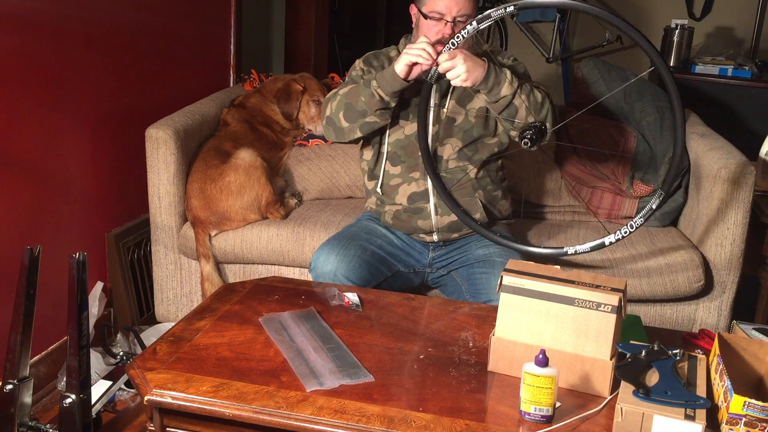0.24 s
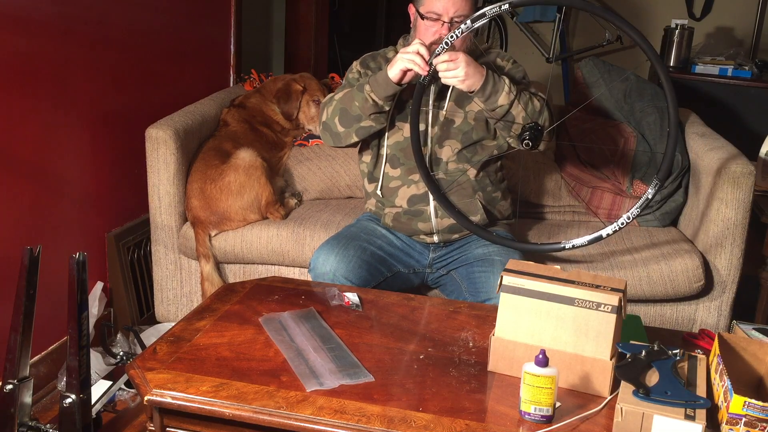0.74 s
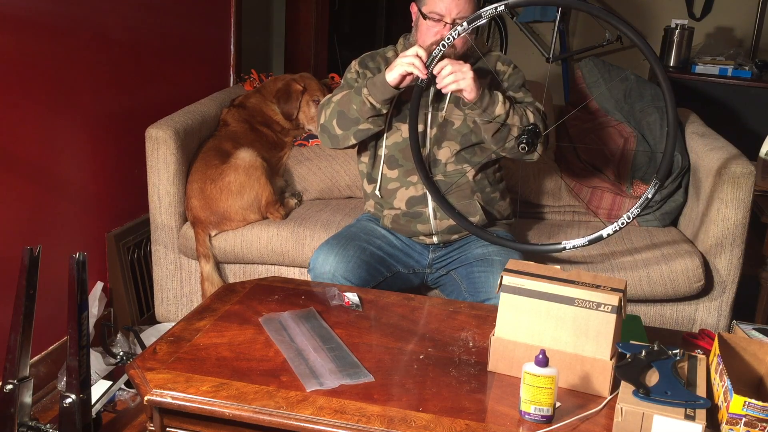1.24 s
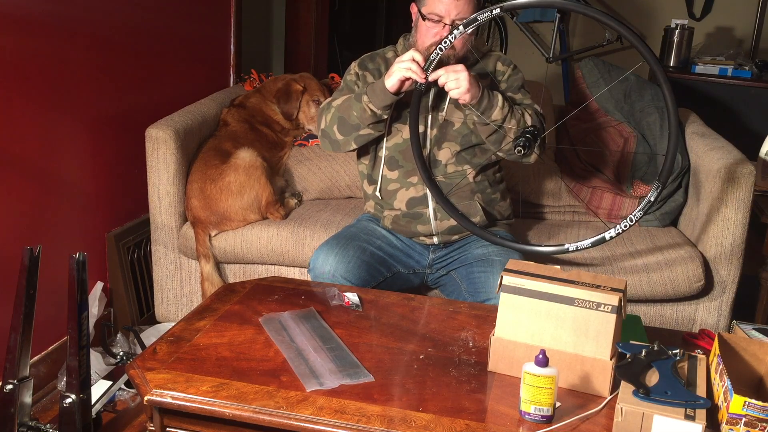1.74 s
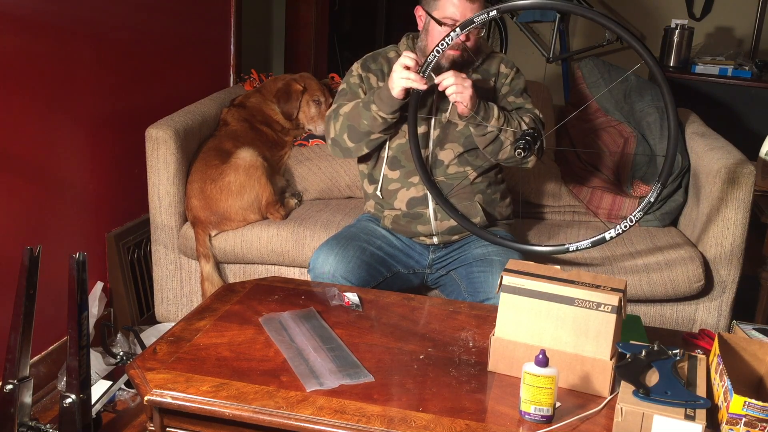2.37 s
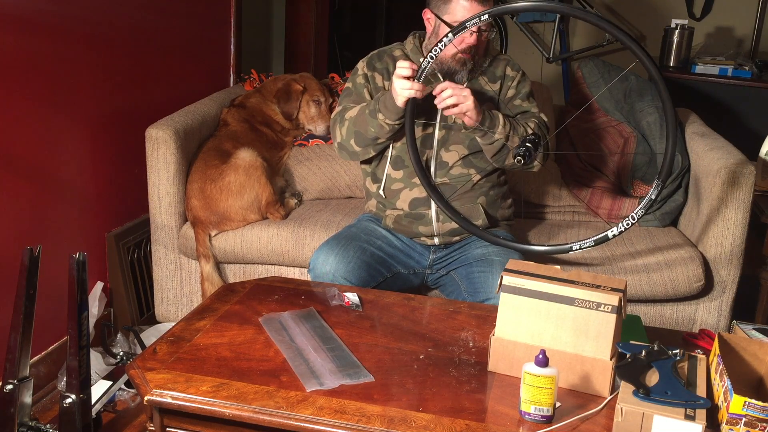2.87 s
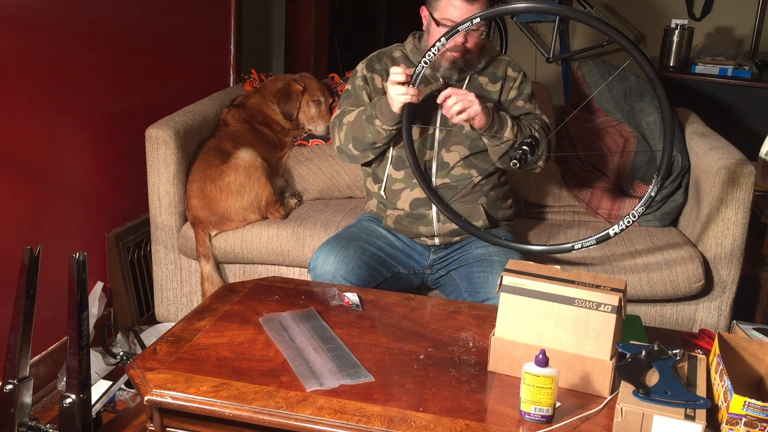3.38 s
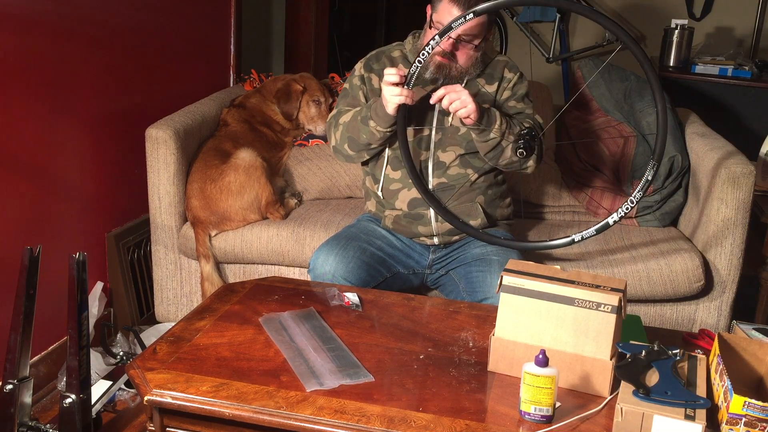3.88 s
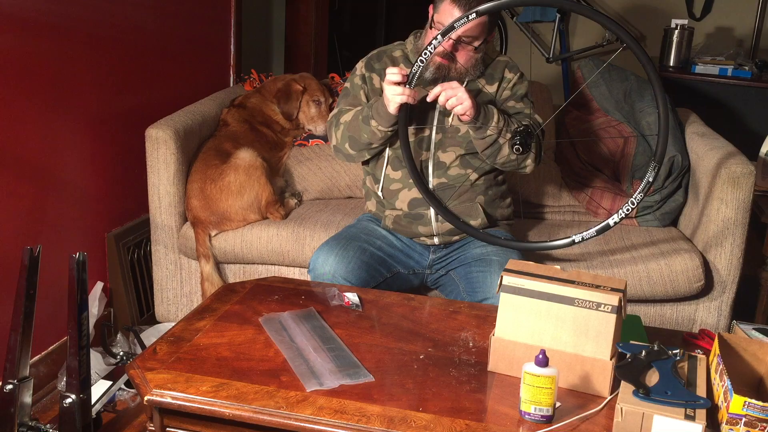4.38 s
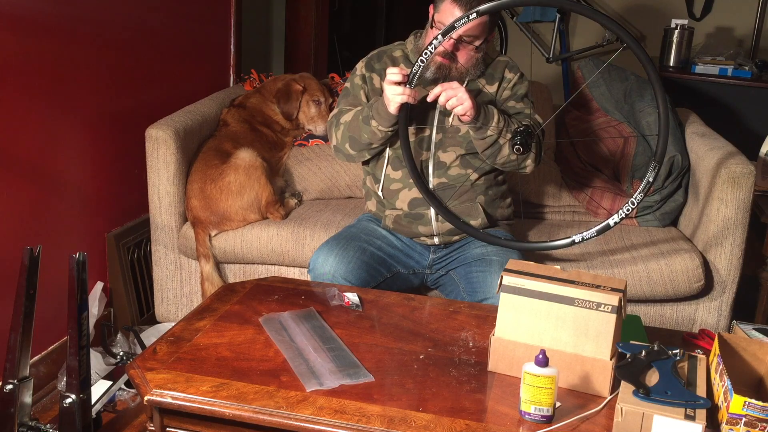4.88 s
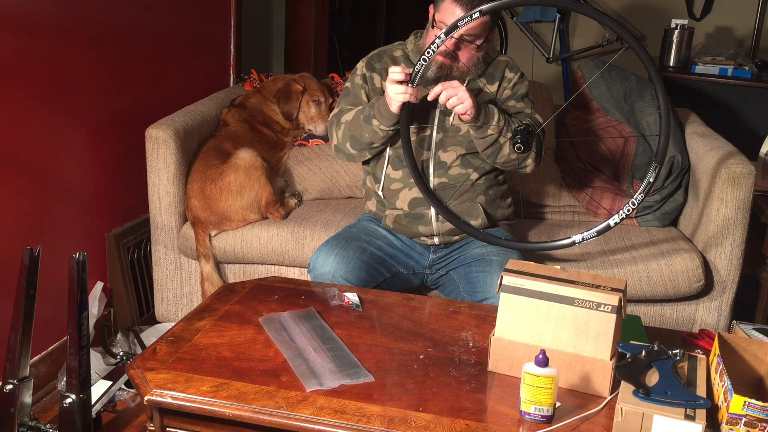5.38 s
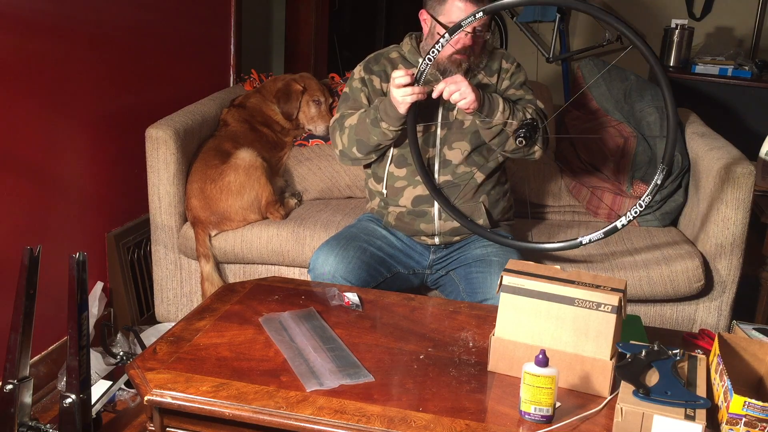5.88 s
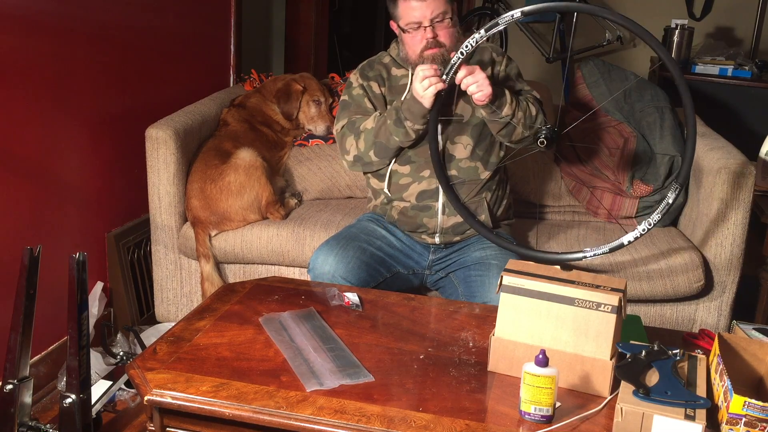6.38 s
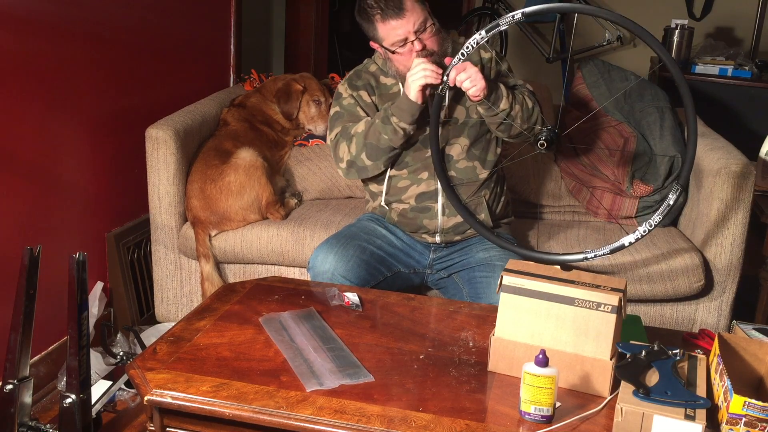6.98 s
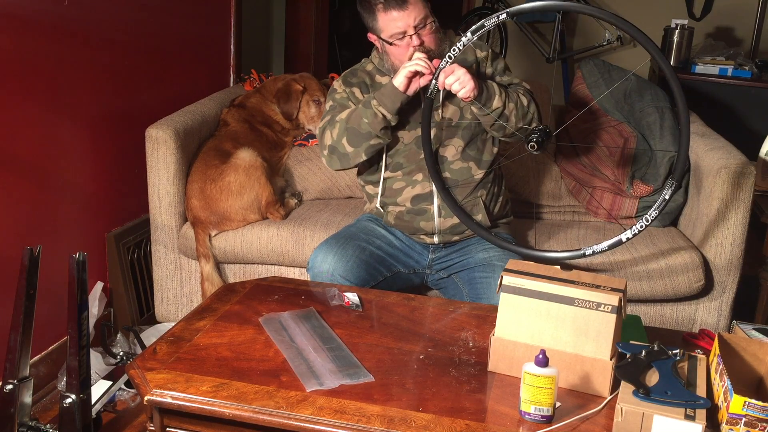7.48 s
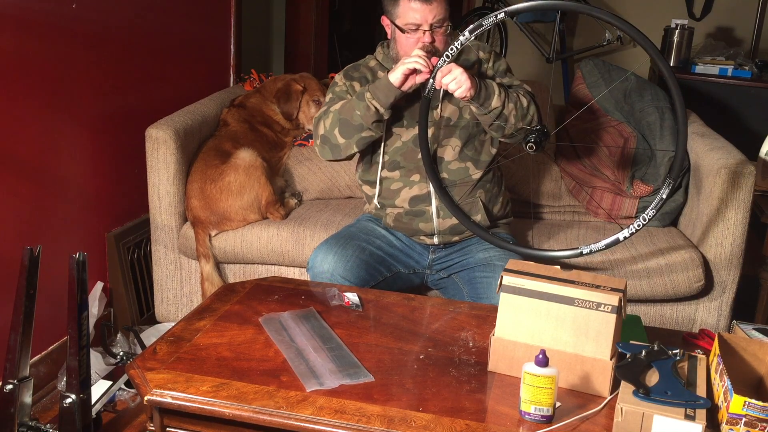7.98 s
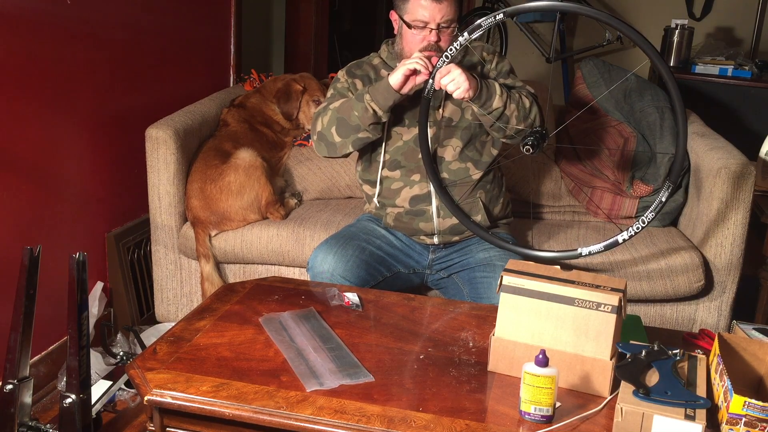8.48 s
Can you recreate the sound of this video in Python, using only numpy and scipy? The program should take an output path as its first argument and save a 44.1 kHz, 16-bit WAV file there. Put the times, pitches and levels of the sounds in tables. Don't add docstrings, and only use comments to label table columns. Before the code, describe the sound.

In a quiet living room, someone fits loose spokes into a hollow bicycle rim. Light steel ticks, short rattles and small scraping slides come irregularly, strongest near three to four seconds. A pause follows, then a hard knock and clatter just before six seconds, then sparse faint ticks and one last knock. A microphone a few steps away catches short room echo and faint hiss.

```python
import sys
import numpy as np
from scipy import signal
from scipy.io import wavfile
from scipy.ndimage import uniform_filter1d

SR = 44100
rng = np.random.default_rng(int(sys.argv[2]) if len(sys.argv) > 2 else 0)


def elevation(decibels):
    levels = np.asarray(decibels, float)
    return 10 ** (levels / 20)


def master(y):
    cut = np.clip(np.atleast_2d(y).T, -1, 1)
    pcm = np.round(cut * 32767)
    wavfile.write(sys.argv[1], SR, pcm.astype(np.int16))


N = 384993

# f/Hz, density/dB per Hz
HISS_COLOUR = [(28, -41), (55, -6.5), (120, -12.5), (300, -7), (450, -8.5), (800, -11), (1700, -11.5),
               (2700, -17), (6000, -23.5), (10500, -30), (13000, -30.5), (15600, -32.5), (15900, -45),
               (17000, -68.5)]
# f/Hz, level/dB rms
HUM_TONES = [(119.5, -80), (240, -65), (397, -76)]
RIM_HZ = [1626, 1807, 1858, 1893, 2125, 2330, 2467, 2530, 2638, 2995, 3170, 3240, 3530, 3660, 3910, 3960,
          4140, 4595]
RIM_DB = [-4, -35, -6, -0.5, -6.5, -21, -10.5, -1, -1, -15, -5, -2.5, -8.5, 3, -0.5, -36, 2.5, 2]
HOLLOW_HZ = [420, 660, 815, 960, 1150, 1282, 1330, 1400, 1450]
HOLLOW_DB = [-20.5, -22, -3, -9, -2, 7, 1.5, 2.5, 0]
SPOKE_HZ = [5050, 5319, 5520, 5701, 5990, 6347, 6557, 6961, 7343, 7465, 8147, 8500, 8755, 9232, 9800]
SPOKE_DB = [-5, -4.5, -0.5, -4, 0, 2.5, 0, 0, -4.5, -4.5, -1, -4.5, -3, -0.5, -4]
NIPPLE_HZ = [10500, 11180, 11760, 12540, 12890, 13150, 13680, 14200, 14440, 14900, 15270, 15550]
NIPPLE_DB = [-8, -3, 2, -11, 5, -22, -28, 12.5, -11, -12, -10, 1.5]
# t/s, rim wall level/dB, spoke over rim/dB, favoured f/Hz
TICKS = [(.092, -52.5, -7, 2120), (.423, -39, -14, 3080), (.4414, -37.5, 7, 3730), (.5644, -54, 18.5, 1800),
         (1.0154, -33, -4.5, 2400), (1.034, -31.5, -10, 2520), (1.2314, -63, 23.5, 8950),
         (1.5344, -39.5, -6, 2040), (1.8921, -39, -5.5, 1940), (2.4982, -29, -7.5, 1270),
         (2.6934, -50, 11, 2550), (2.8344, -26, 2.5, 1480), (3.032, -42, 1.5, 4220),
         (3.1567, -39.5, 3.5, 4320), (3.3538, -49, -3.5, 4600), (3.3844, -52, -1.5, 2640),
         (3.4052, -35.5, -3, 2566), (3.5897, -47.5, -24, 2390), (3.7519, -22, -12, 1530),
         (6.12, -45, 0.5, 3655), (7.1756, -45, 3, 3870), (7.3332, -52, -2.5, 4610),
         (7.3746, -47.5, -3, 3520), (7.7029, -41.5, -14, 1550), (7.7548, -49.5, 0, 3680),
         (7.8047, -58, -4, 1880), (8.0621, -43.5, 1, 1600), (8.2074, -68.5, 17, 1680),
         (8.5415, -54, -3.5, 2130)]
# t/s, rim wall level/dB, spoke over rim/dB, favoured f/Hz
TAPS = [(.3144, -39.5, -3, 1550), (.8579, -40, -7.5, 3340), (3.5054, -49.5, -23, 870),
        (4.6404, -39, -14, 1620), (4.702, -68, -20, 1650), (6.3144, -56.5, -18, 808),
        (6.402, -54, -11, 1344), (6.6094, -64, 5, 907), (6.7006, -44.5, -1.5, 1910), (6.71, -55, -18, 1500),
        (7.5677, -44.5, -10.5, 2900), (7.5818, -49.5, -19, 1540), (7.897, -53, -23, 940),
        (8.328, -57, -16, 1560)]
# t/s, rim wall level/dB, spoke over rim/dB, favoured f/Hz
KNOCKS = [
    (5.7632, -27.5, 5.5, 2460),
    (5.7655, -18, -9, 1310),
    (5.769, -13, -16, 4000),
    (8.3858, -30, -5.5, 1625),
    (8.393, -39.5, -15.5, 2690),
]
# t/s, nipple level/dB, spoke level/dB
CLICKS = [(0.614, -47, -42.5), (1.513, -49, -55), (1.6362, -60, -60), (1.7255, -46, -43), (2.089, -44, -56),
          (2.1809, -58, -63), (2.368, -59, -52.5), (2.586, -45, -43), (2.955, -43.5, -51),
          (3.475, -50, -64), (3.7821, -21, -33.5), (4.3464, -69, -71), (4.3863, -67, -70),
          (5.8244, -21, -27.5), (7.3746, -38, -50), (7.9578, -64, -74), (8.3866, -35.5, -51)]
# f/Hz, t60/s
ROOM_T60 = [(300, 0.33), (1000, 0.2), (3000, 0.36), (7000, 0.26), (15000, 0.13)]
# t/s, rim wall level/dB, spoke over rim/dB, favoured f/Hz
RATTLES = [(.3242, -27.5, -12, 1460), (.3381, -29, -19, 1040), (.4544, -25.5, -13, 2900),
           (1.4471, -38, -15, 1780), (1.5512, -34, -12.5, 1290), (1.5724, -45, -22, 2530),
           (1.9036, -36.5, -23, 2650), (2.0896, -33, -4, 2930), (2.2975, -25.5, -14, 2490),
           (2.3257, -31.5, -22, 1770), (2.7597, -22.5, -15.5, 2500), (2.78, -25, -10, 1500),
           (2.8097, -25, -2, 2780), (3.0465, -31.5, -4, 1880), (3.169, -33, -13, 1676),
           (3.4117, -35, -12, 2330), (3.4387, -38, -18, 2380), (3.728, -37.5, 2, 2020),
           (3.7421, -17, -6.5, 1860), (4.4479, -36.5, -23, 2400), (4.4654, -32.5, -24, 1720),
           (4.6574, -47, -21, 1630), (4.9796, -41.5, -16, 1860), (5.3216, -34.5, -13, 3860),
           (5.3343, -31.5, -16, 1840), (6.104, -37.5, -12, 2550), (6.1724, -34, -6.5, 2600),
           (6.1883, -34, -16, 830), (7.4634, -42, -5, 4640), (8.41, -38, 2, 1450)]
# start t/s, length/s, last rim wall level/dB, spoke over rim/dB, favoured f/Hz
SLIDES = [
    (.4894, 0.069, -26, -14, 1890),
    (2.488, .04, -19, -6.5, 2170),
    (3.988, 0.036, -17.5, -5, 2630),
    (5.7215, 0.032, -20, -5, 1890),
]
# start t/s, length/s, first rim wall level/dB, spoke over rim/dB, favoured f/Hz
CLATTERS = [(.5756, 0.034, -29.5, -6, 1880), (1.0462, 0.074, -23.5, -9, 1740),
            (1.6763, .06, -30, -0.5, 2640), (2.55, 0.066, -28.5, -5, 1720), (2.8449, 0.04, -18, -4, 1940),
            (2.9028, 0.054, -32.5, -13, 2200), (3.7744, 0.097, -19.5, -6.5, 1700),
            (4.0478, .035, -20, -4, 1554), (4.0913, 0.047, -21.5, -4, 1480),
            (5.776, 0.029, -14.5, -3, 3010), (5.8229, 0.094, -15.5, -2.5, 2120)]
# t/s, level/dB rms, f/Hz, t60/s
PINGS = [(.325, -38.5, 675, 0.066), (.55, -48.5, 815, 0.16), (1.045, -46, 822, 0.15),
         (1.545, -43, 815, 0.04), (2.105, -53.5, 434, 0.09), (2.304, -38.5, 1832, 0.17),
         (2.301, -46.5, 2530, 0.29), (2.498, -37.5, 1283, 0.3), (2.521, -51, 436, 0.12),
         (2.762, -38.5, 1860, 0.51), (3.164, -48.5, 1624, 0.22), (3.506, -46, 973, 0.056),
         (3.749, -31.5, 982, 0.051), (3.752, -51.5, 408, 0.14), (4.644, -38, 1660, 0.077),
         (5.334, -65, 3890, 0.065), (5.725, -39, 819, 0.23), (6.188, -45.5, 821, 0.088)]
# t/s, level/dB, f/Hz
BUMPS = [
    (0.597, -65, 214),
    (2.121, -60, 151),
    (2.529, -69, 220),
    (3.517, -57, 149),
    (3.759, -69, 214),
    (5.765, -51.5, 302),
    (5.769, -58, 157.4),
    (7.58, -61, 149),
]


def evened(x):
    return x / np.sqrt(np.mean(x ** 2) + 1e-20)


def add(mix, s, sound):
    part = mix[round(s * SR):][:len(sound)]
    part += sound[:len(part)]


def read(points, hz):
    f, value = np.transpose(points)
    return np.interp(np.log(hz + 1), np.log(f + 1), value)


def drift(per_s):
    return np.interp(np.arange(N) / SR * per_s, np.arange(400), rng.standard_normal(400))


def hiss():
    frames, hz = N // 512 + 5, np.fft.rfftfreq(2048, 1 / SR)
    real, imag, patches = rng.standard_normal((frames, 1025, 3)).T
    patches = uniform_filter1d(uniform_filter1d(patches, 20, 0), 10, 1)
    level_db = read(HISS_COLOUR, hz)[:, None] + 1.2 * evened(patches)
    z = (real + 1j * imag) * elevation(level_db)
    return elevation(-60) * evened(signal.istft(z, nperseg=2048, noverlap=1536)[1][:N])


def hum():
    out = np.zeros(N)
    for hz, db in HUM_TONES:
        level = elevation(db + 2.5 + 1.2 * drift(12.0))
        phase = 2 * np.pi * np.cumsum(hz + 1.13 * drift(14)) / SR
        out += level * np.sin(phase)
    return out


def struck(hz, db, t60, favoured_hz, crack_db):
    hz, t, count = np.array(hz), np.arange(4096) / SR, len(favoured_hz)
    waves = np.sin(2 * np.pi * hz[:, None] * t)
    luck = rng.standard_normal((count, 2, len(hz)))
    away = np.log(hz / favoured_hz[:, None])
    favour_db = 6 * np.exp(-(away / .025) ** 2) - 13 * np.minimum(abs(away), 1)
    share = elevation(db + 4.0 * luck[:, 0] + favour_db) * np.sign(luck[:, 1])
    mode_t60 = max(t60, .01) * (hz.min() / hz[:, None]) ** 0.093
    ring = share @ (waves * elevation(-60 * t / mode_t60))
    ring *= 1 - np.exp(-t / 0.0007)
    scuff = rng.standard_normal((count, 512)) * np.exp(-t[:512] / 0.0028)
    blunt_t60 = .012 * (2000 / hz[:, None]) ** .5
    thump = share @ (waves * elevation(-60 * t / blunt_t60))
    crack = signal.fftconvolve(thump, scuff, axes=1)[:, :4096]
    ring /= ring[:, :200].std(1)[:, None]
    crack /= crack[:, :200].std(1)[:, None]
    return ring + elevation(crack_db) * crack


def bounces(count, swell, per_s):
    t, chance = np.arange(2048) / SR, rng.random((count, 2048, 3))
    hits = chance[..., 0] < per_s / SR
    force = elevation(-3 * np.log(chance[..., 1] + 1e-9))
    side = np.sign(chance[..., 2] - .5)
    return hits * force * side * (t / swell * np.exp(1 - t / swell)) ** 2


def parts_of(rows, hollow_db, nipple_db):
    s, db, spoke_db, hz = np.transpose(rows)
    hollow = db + hollow_db - 3.5 * np.log2(hz / 2000)
    nipple = db + 0.87 * spoke_db + nipple_db
    return np.transpose([s, db, hollow, db + spoke_db, nipple, hz])


def wheel(rows, t60s, runs, boost_db, blunt_db, size):
    rows, out = np.array(rows), np.zeros(N)
    modes_hz = [RIM_HZ, HOLLOW_HZ, SPOKE_HZ, NIPPLE_HZ]
    modes_db = [RIM_DB, HOLLOW_DB, SPOKE_DB, NIPPLE_DB]
    cracks_db = [0.23, 2.4, 4.1, 2.0]
    rings = np.array([struck(hz, db, t60, rows[:, 5], crack_db + blunt_db)
                      for hz, db, t60, crack_db in zip(modes_hz, modes_db, t60s, cracks_db)])
    rings = signal.fftconvolve(rings, runs[None], axes=2)
    rings /= np.sqrt(uniform_filter1d(rings[..., :2048] ** 2, size).max(2))[..., None]
    levels = elevation(rows[:, 1:5].T + boost_db)[..., None]
    for s, sound in zip(rows[:, 0], (levels * rings).sum(0)):
        add(out, s, sound)
    return out


def thin_hoop(x):
    return signal.sosfilt(signal.butter(4, 520, "highpass", fs=SR, output="sos"), x)


def ticks():
    blows = [*parts_of(TICKS, -10, 0), *parts_of(TAPS, 2.6, -1.5), *parts_of(KNOCKS, -2, 8.7)]
    blows += [(s, -120, -120, spoke_db + 2.5, nipple_db, 2000) for s, nipple_db, spoke_db in CLICKS]
    held_t60 = [0.0495, 0.053, 0.067, 0.04]
    skid_s = .0005
    skids = bounces(len(blows), skid_s, 9000)[:, :400]
    out = wheel(blows, held_t60, skids, boost_db=-3.0, blunt_db=3.5, size=200)
    return thin_hoop(np.roll(out, -round(skid_s / 2 * SR)))


def room(x):
    taps = np.zeros((3, SR // 2))
    at = np.arange(200, SR // 2 - 20, 20) + rng.integers(0, 20, (3, (SR // 2 - 201) // 20))
    np.put_along_axis(taps, at, rng.choice([-1., 1.], at.shape), 1)
    hz, t, z = signal.stft(taps, SR, nperseg=256)
    decay = elevation(-60 * t / read(ROOM_T60, hz)[:, None])
    tails = signal.istft(z * decay, SR, nperseg=256)[1]
    cycles = np.arange(N) / SR * 7 + np.arange(3)[:, None] / 3
    turns = np.sqrt(2 / 3) * np.cos(2 * np.pi * cycles)
    return signal.fftconvolve(x * turns, tails / np.linalg.norm(tails[0]), axes=1)[:, :N].sum(0)


def runs_of(rows, gain_db, spoke_gain_db, db_per_s, spoke_db_per_s):
    s, length, db, spoke_db, hz = np.transpose(rows)[..., None]
    u = np.linspace(0, 1, 4)
    stray = np.exp(.08 * rng.standard_normal((len(rows), 4)))
    level = db + gain_db * (u - 1) + db_per_s * u * length
    bright = spoke_db + spoke_gain_db * (u - 1) + spoke_db_per_s * u * length
    return np.transpose([c.ravel() for c in (s + u * length, level, bright, hz * stray)])


def rattles():
    slides = runs_of(SLIDES, gain_db=7.5, spoke_gain_db=1.5, db_per_s=0, spoke_db_per_s=0)
    clatters = runs_of(CLATTERS, gain_db=0, spoke_gain_db=0, db_per_s=-110, spoke_db_per_s=-87)
    blows = parts_of([*RATTLES, *slides, *clatters], hollow_db=-9.5, nipple_db=-4.5)
    free_t60 = [0.12, 0.16, 0.12, .045]
    runs = bounces(len(blows), 0.0079, 2500)
    out = wheel(blows, free_t60, runs, boost_db=-13, blunt_db=0.773, size=400)
    return thin_hoop(np.roll(out, -round(.004 * SR)))


def pings():
    t, out = np.arange(12000) / SR, np.zeros(N)
    for s, db, hz, t60 in PINGS:
        decay = elevation(db + 7.5 - 60 * t / max(t60, .02))
        swell = 1 - np.exp(-t / 0.0054)
        add(out, s, decay * swell * np.sin(2 * np.pi * hz * t))
    return out


def bumps():
    t, out = np.arange(8192) / SR, np.zeros(N)
    puff = t / .025 * np.exp(1 - t / 0.016)
    for s, db, hz in BUMPS:
        add(out, s, elevation(db + 5.0) * np.sin(2 * np.pi * hz * t) * puff)
    return out


def scene():
    quiet = hiss() + hum()
    held = ticks()
    free = rattles() + pings()
    echo = room(elevation(-1.5) * held + elevation(-5) * free)
    return (quiet + held + free + echo + bumps())[None]


def roll_off(x):
    return signal.sosfilt(signal.butter(12, 17010, fs=SR, output="sos"), x)


def record(dry):
    lowpass = signal.firwin(401, 15850, window=("kaiser", 9), fs=SR)[None]
    top = dry - signal.oaconvolve(dry, lowpass, "same")
    power = uniform_filter1d(top ** 2, 256)
    earlier = np.roll(uniform_filter1d(power, 1024), 700)
    sharp = power > 220 * earlier + elevation(-150)
    gate = uniform_filter1d(sharp * 1., 256)
    return roll_off(dry - top * (1 - gate))


dry = scene()
out = record(dry)
master(out)
```